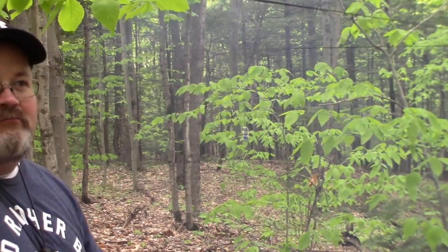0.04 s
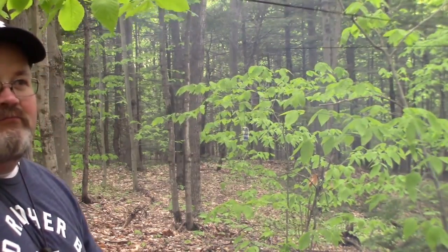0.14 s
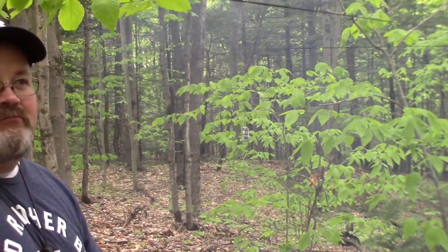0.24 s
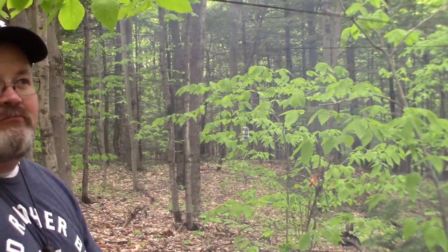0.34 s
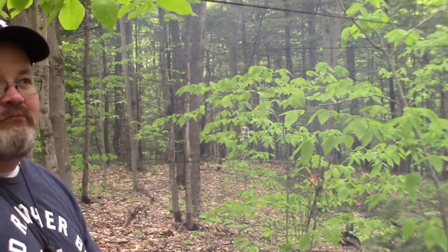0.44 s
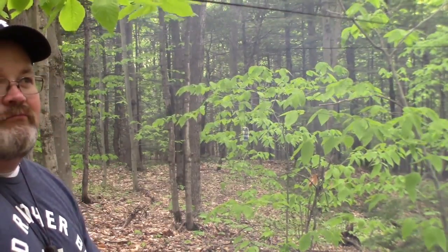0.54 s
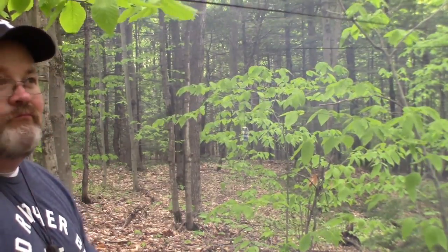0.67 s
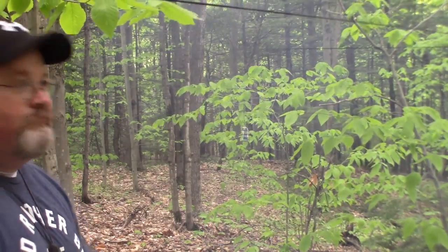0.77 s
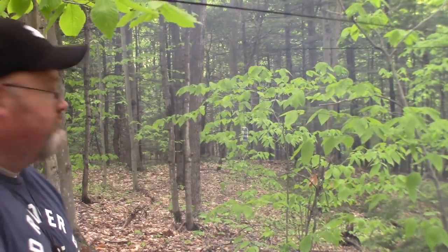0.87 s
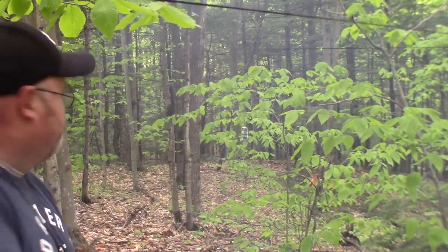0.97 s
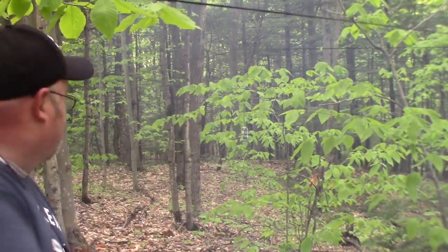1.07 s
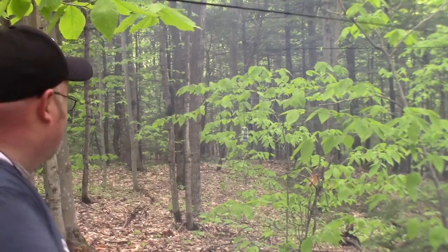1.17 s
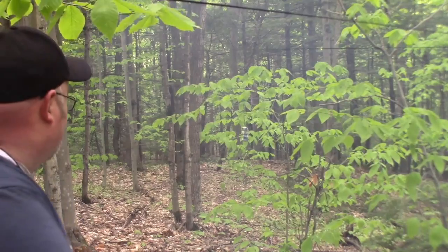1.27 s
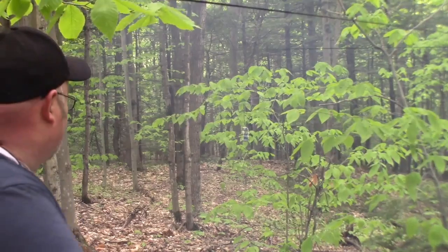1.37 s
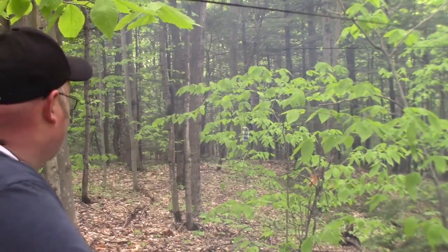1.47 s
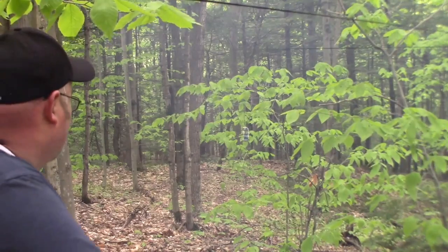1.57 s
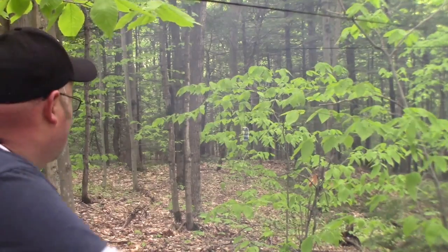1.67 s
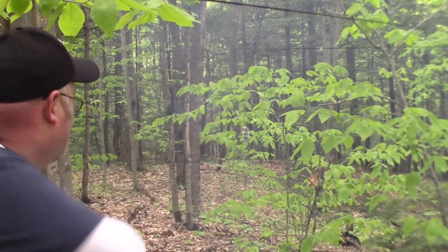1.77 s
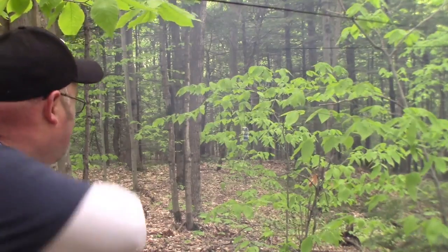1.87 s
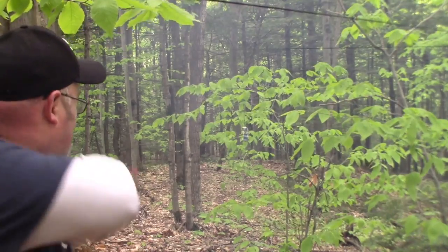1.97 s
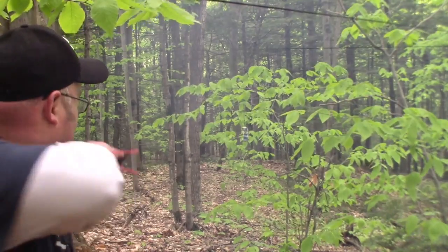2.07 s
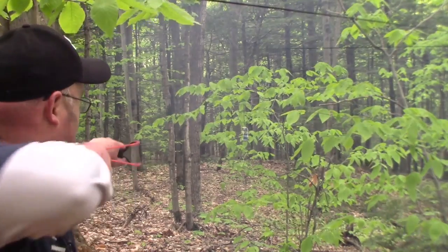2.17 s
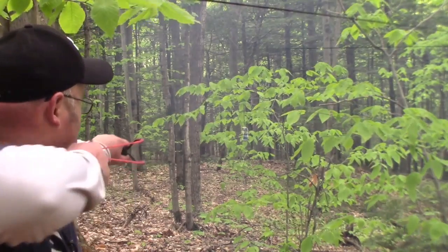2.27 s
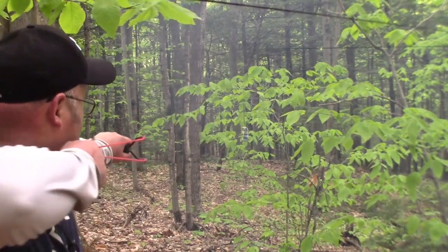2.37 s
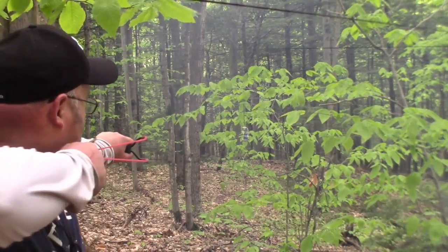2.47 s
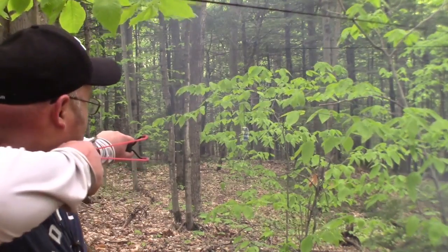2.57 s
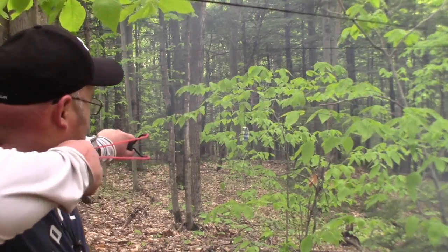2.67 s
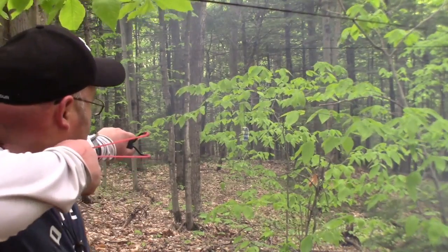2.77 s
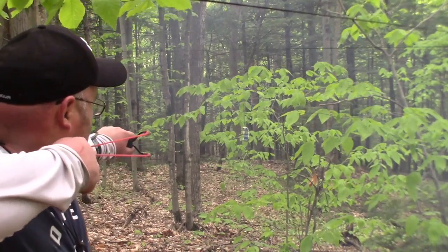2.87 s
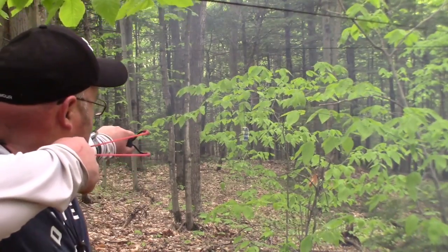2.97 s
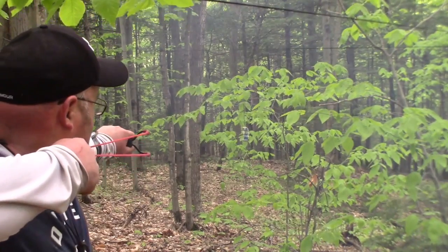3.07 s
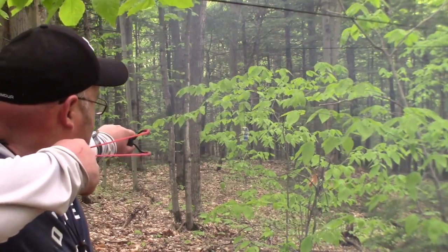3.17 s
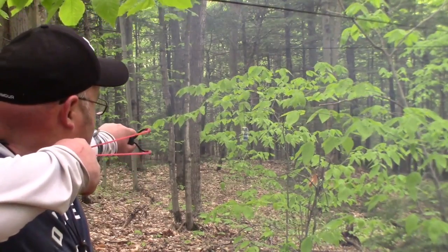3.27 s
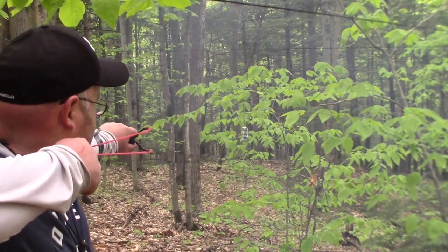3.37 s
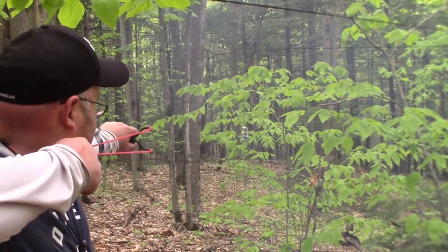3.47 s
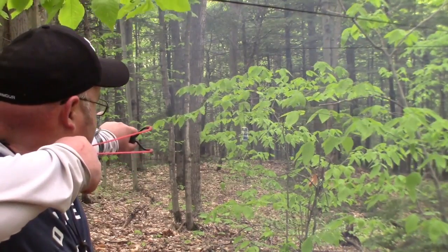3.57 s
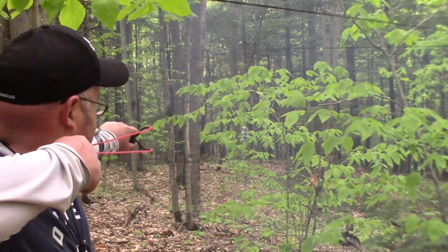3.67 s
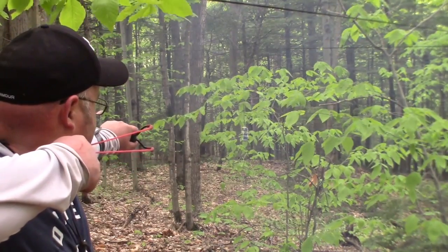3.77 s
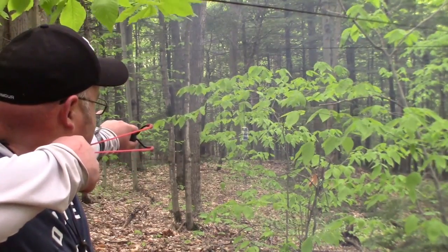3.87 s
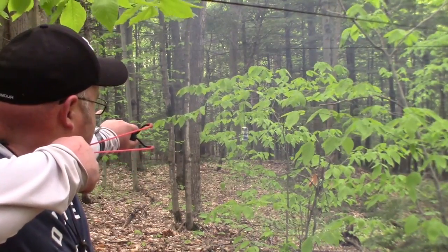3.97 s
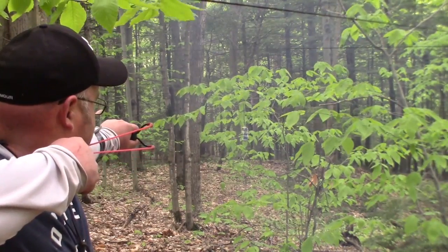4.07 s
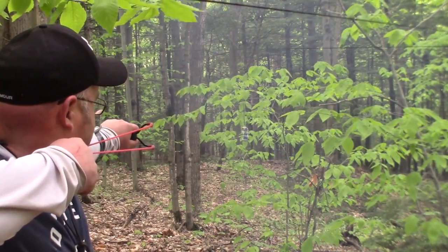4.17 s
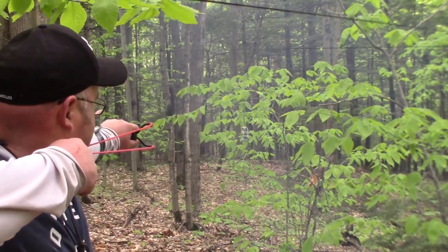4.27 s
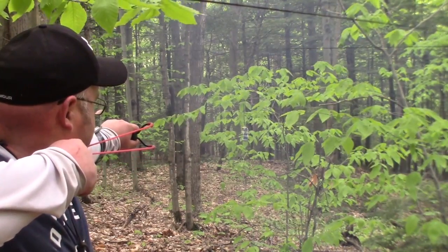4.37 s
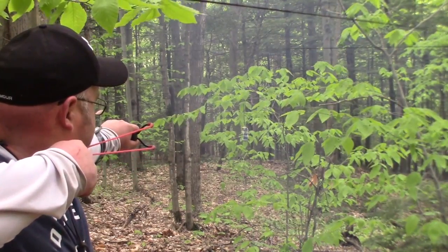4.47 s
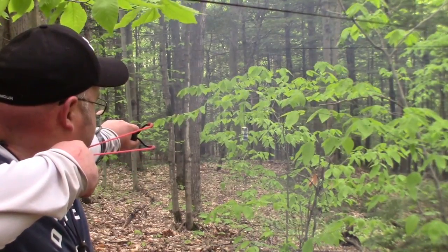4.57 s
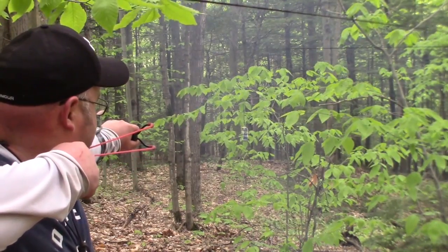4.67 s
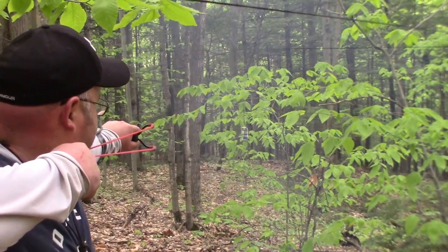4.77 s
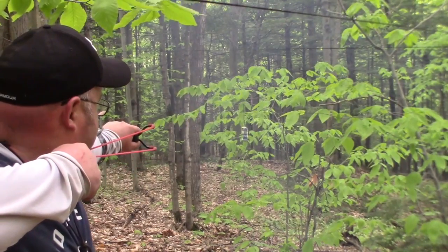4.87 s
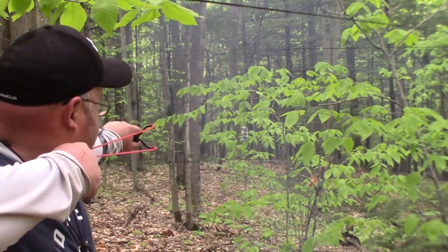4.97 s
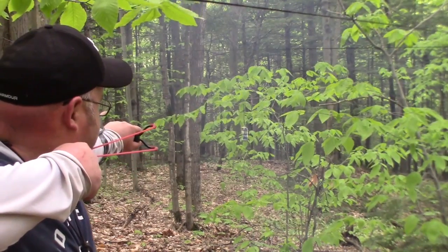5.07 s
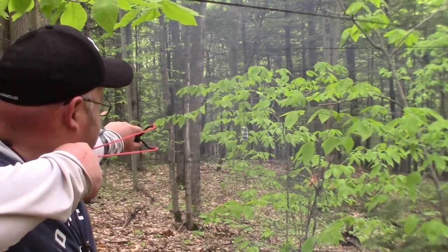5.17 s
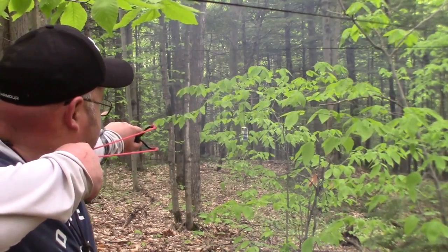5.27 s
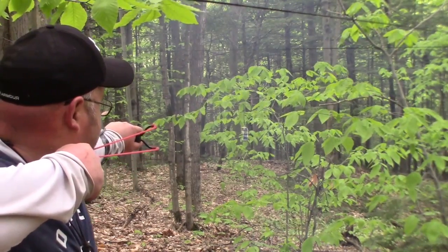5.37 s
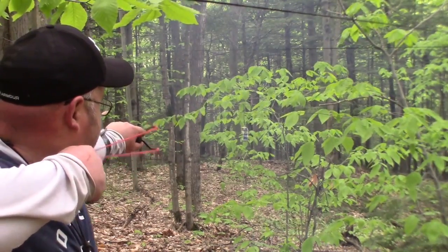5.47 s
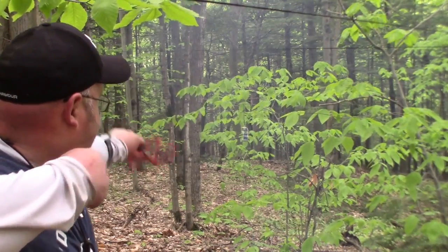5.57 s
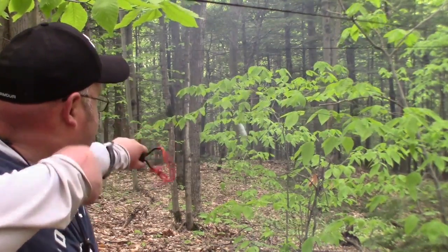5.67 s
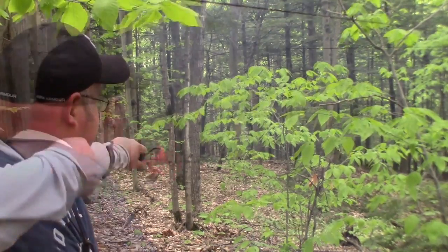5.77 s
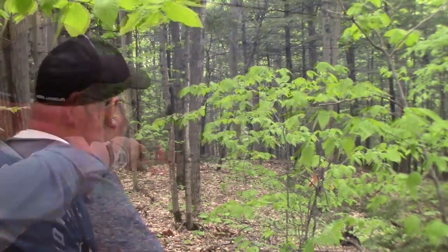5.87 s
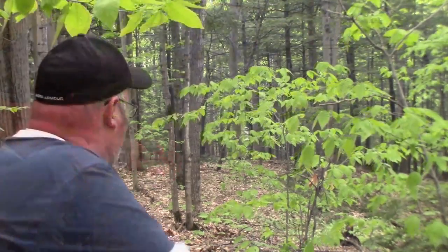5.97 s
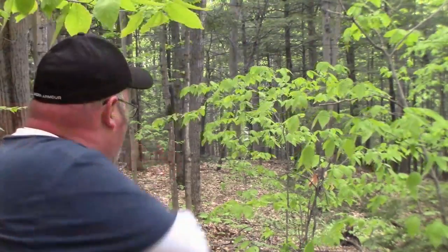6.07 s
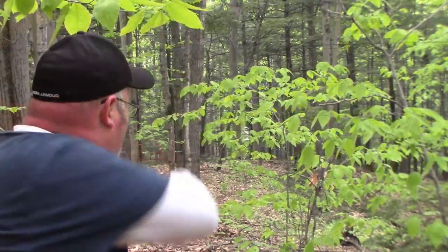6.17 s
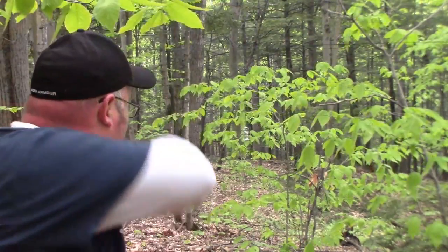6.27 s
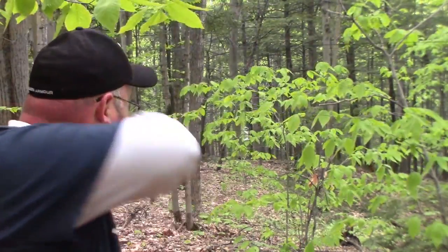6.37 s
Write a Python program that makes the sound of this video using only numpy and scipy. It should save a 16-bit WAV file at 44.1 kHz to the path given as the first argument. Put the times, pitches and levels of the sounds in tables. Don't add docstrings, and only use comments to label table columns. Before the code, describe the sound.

Outdoor woodland with faint distant traffic hum and small wind puffs on the microphone. Leaves and cloth rustle close by with dry twig ticks, while birds repeat burry phrases and one loud upward call. Rubber creaks softly as it is drawn. Near the end the slingshot snaps in a rapid cluster of slaps, a hard crack answers from a trunk and echoes, and cloth brushes by.

```python
import sys
import numpy as np
from scipy import signal
from scipy.fft import rfft, irfft, next_fast_len
from scipy.io import wavfile
from scipy.ndimage import uniform_filter1d

SR = 44100
rng = np.random.default_rng(int(sys.argv[2]) if len(sys.argv) > 2 else 0)


def level_to_linear(level):
    exponent = np.asarray(level, float) / 20
    return 10 ** exponent


def pcm_store(signal):
    levels = np.round(np.clip(np.atleast_2d(signal), -1, 1) * 32767)
    wavfile.write(sys.argv[1], SR, levels.astype(np.int16).T)


N = 283518


def unit(x):
    return x / np.sqrt(np.mean(x ** 2) + 1e-20)


def along(points, hz):
    f, v = np.transpose(points)
    return np.interp(np.log(hz + 1), np.log(f + 1), v)


def filtered(x, response):
    m = next_fast_len(x.shape[-1] + 8192)
    spectrum = rfft(x, m) * response(np.fft.rfftfreq(m, 1 / SR))
    return irfft(spectrum, m)[..., :x.shape[-1]]


def noise(spectrum, alike, patchy_db=1, size=N):
    z = signal.stft(rng.standard_normal((2, size + 512)), nperseg=256)[2]
    patches = uniform_filter1d(rng.standard_normal(z.shape[1:]), 4, 0)
    patches = unit(uniform_filter1d(patches, 8, 1))
    pair = signal.istft(z * level_to_linear(patchy_db * patches), nperseg=256)[1][:, :size]

    def mid_side_gain(hz):
        turn = np.arccos(np.clip(along(alike, hz), -1, 1)) / 2
        return level_to_linear(along(spectrum, hz)) * [np.cos(turn), np.sin(turn)]

    mid, side = filtered(pair, mid_side_gain)
    return unit(np.array([mid + side, mid - side]))


def pan(db):
    return level_to_linear([[db / 2], [-db / 2]])


def add(track, s, sound):
    part = track[..., round(s * SR):][..., :sound.shape[-1]]
    part += sound[..., :part.shape[-1]]


def swells(rows):
    t = np.arange(N) / SR
    levels = [db - 20 * np.maximum((s - t) / rise_s, (t - s) / fall_s) for s, db, rise_s, fall_s in rows]
    return level_to_linear(np.max(levels, axis=0))


def burst(hz, octaves, t60):
    t = np.arange(4096) / SR
    x = filtered(rng.standard_normal(4096), lambda f: np.exp(-.5 * (np.log2((f + 1) / hz) / octaves) ** 2))
    x = x * level_to_linear(-60 * t / t60) * (1 - np.exp(-t / 0.00014))
    return x / np.abs(x).max()


def whistle(notes, shift_s=0, gain_db=0, fade_s=0.0021):
    out = np.zeros(N)
    for note in notes:
        s, hz, db, burr_hz = np.transpose(note)
        t = np.arange(s[0], s[-1], 1 / SR)
        fade = np.minimum(1, np.minimum(t - s[0], s[-1] - t) / fade_s)
        shake = unit(uniform_filter1d(rng.standard_normal(2 * SR), 60))[:len(t)]
        pitch_hz = np.interp(t, s, hz) + shake * np.interp(t, s, burr_hz)
        tone = np.sqrt(2) * np.sin(2 * np.pi * np.cumsum(pitch_hz) / SR)
        add(out, max(0, s[0] + shift_s), fade * level_to_linear(np.interp(t, s, db) + gain_db) * tone)
    return out


def burred(note, burr_hz):
    return [(*row, burr_hz) for row in note]


def glides(rows, burr_hz, knee, done, onset_db, end_db):
    notes = []
    for s, length, hz, last_hz, db in rows:
        onset = (s, hz, db + onset_db)
        loudest = (s + knee * length, hz + done * (last_hz - hz), db)
        end = (s + length, last_hz, db + end_db)
        notes.append(burred([onset, loudest, end], burr_hz))
    return notes


def calls_up(rows, sag, fade_db):
    effort_db_per_octave, hold_s, climb_burr_hz, hold_burr_hz = 21, .18, 125, 95
    notes = []
    for s, climb, hz, top_hz, db in rows:
        start_db = db - effort_db_per_octave * np.log2(top_hz / hz)
        notes.append([(s, hz, start_db, climb_burr_hz),
                      (s + climb, top_hz, db, climb_burr_hz),
                      (s + climb + hold_s, sag * top_hz, db - fade_db, hold_burr_hz)])
    return notes


def among_trees(x, direct_db, t60, pan_db, alike):
    t = np.arange(SR) / SR
    a, b = rng.standard_normal((2, SR)) * level_to_linear(-60 * t / t60) * (1 - np.exp(-t / 0.0033))
    tail = np.array([a + alike * b, a - alike * b]) / np.linalg.norm(a)
    scattered = signal.fftconvolve(x[None], tail, axes=1)[:, :N]
    return pan(pan_db) * (level_to_linear(direct_db) * x + scattered)


def background():
    # [f/Hz, level/dB per Hz]
    air = [(12, -37), (20, -3.5), (98, -0.5), (185, -4), (266, -0.5), (352, -3), (534, -4), (649, -7),
           (833, -7.5), (1130, -13.5), (1920, -21), (5230, -25.5), (14200, -32), (15500, -31.5)]
    # [f/Hz, likeness 0..1]
    likeness = [(60, 0.9), (240, 0.93), (950, 0.84), (3770, 0.26), (15000, 0.26)]
    return level_to_linear(-49) * noise(air, likeness, patchy_db=0.75)


def buffet():
    # [t/s, peak level/dB, fall by 20 dB/s]
    puffs = [(0, -46, .25), (.27, -52, .5), (.84, -49, .25), (1.98, -60, .8), (2.57, -56, .3),
             (2.78, -44, 0.15), (3.35, -58, .3), (3.6, -54, .4), (4.0, -62, 2), (4.54, -56, .3),
             (4.93, -54, .15), (5.08, -56, .4), (5.64, -51, .12), (6.03, -50, .12), (6.13, -39, .35),
             (6.24, -41, .3), (6.35, -41, 0.5)]
    rumble = [(15, -4.5), (30, -0.5), (60, -9.0), (110, -24.0), (200, -59)]  # (f/Hz, level/dB per Hz)
    stir = noise(rumble, [(30, 0.97)], patchy_db=0.5)
    rise_share = .45
    return swells([(s, db, rise_share * fall_s, fall_s) for s, db, fall_s in puffs]) * stir


def rustle():
    # [t/s, peak level/dB, rise by 20 dB/s, fall by 20 dB/s]
    moves = [
        (0, -60.5, .01, 0.2),
        (.178, -51, .008, .2),
        (.335, -55.5, .015, 0.08),
        (.42, -59, .05, 0.2),
        (.755, -59.5, 0.33, .3),
        (1.01, -62, .5, 0.6),
        (1.35, -60, 0.3, .15),
        (2.05, -66.5, 6.0, 2.5),
    ]
    # [f/Hz, level/dB per Hz]
    cloth = [(880, -46), (1500, -10), (1950, -6), (2620, -14), (3870, -3), (6010, -3.5), (6820, -10.5),
             (10500, -10), (15500, -21.5)]
    # [t/s, peak level/dB, centre f/Hz]
    ticks = [(0.185, -35, 8420), (0.197, -28, 6900), (0.334, -41.5, 7940), (0.393, -55, 8090),
             (0.405, -40, 7420), (0.4707, -40, 10300), (0.4977, -41, 10600), (0.585, -53, 7460),
             (0.6217, -41, 9810), (0.9, -41, 7970), (1.06, -23.5, 7100), (1.3384, -27, 6650),
             (1.6055, -37, 9010), (1.8022, -41, 9100), (1.9603, -47, 11700), (2.152, -41, 8200),
             (2.3375, -48, 8340), (3.553, -41.5, 10200), (3.7244, -39.5, 9730), (4.0022, -54, 9610),
             (4.4198, -50, 8860), (5.0294, -52, 8560)]
    # [t/s, peak level/dB, rise by 20 dB/s, fall by 20 dB/s]
    arm = [(6.25, -53.5, .22, 5)]
    # [f/Hz, level/dB per Hz]
    sleeve = [(410, -33), (700, -17), (895, -2), (1010, -5), (1100, -6), (1240, -8), (5020, -14),
              (15500, -34.5)]
    out = level_to_linear(5) * swells(moves) * noise(cloth, [(5000, 1.0)], patchy_db=2.5)
    out = out + swells(arm) * noise(sleeve, [(3000, .9)], patchy_db=0.0)
    for s, db, hz in ticks:
        snap = level_to_linear(db) * burst(hz, octaves=0.46, t60=0.0019)
        crackle = level_to_linear(db - 15.5) * burst(hz, octaves=.8, t60=0.1)
        add(out, s, snap + crackle)
    return out * pan(-1.3)


def whistler():
    # [t/s, f/Hz, level/dB]
    slur = [
        (3.6, 3600, -67),
        (3.625, 4180, -62),
        (3.66, 4430, -55.5),
        (3.74, 4390, -69.5),
        (3.9, 4370, -77),
        (3.975, 3480, -66),
        (4.12, 3380, -70),
        (4.45, 3800, -64.5),
        (4.7, 4060, -66.5),
    ]
    # [t/s, length/s, first f/Hz, last f/Hz, level/dB]
    clear = [
        (4.93, .11, 4280, 4920, -59.5),
        (5.23, .15, 4120, 3780, -66.5),
        (.17, .23, 3850, 3400, -68),
        (4.7, .14, 4050, 3980, -73),
    ]
    # [t/s, length/s, first f/Hz, last f/Hz, level/dB]
    hoarse = [
        (5.05, 0.17, 4950, 5750, -65),
        (3.63, .22, 3920, 4020, -65.5),
        (3.9, .09, 4200, 3500, -67),
        (2.46, .3, 2650, 2750, -67),
        (0, .14, 3000, 2900, -57),
    ]
    notes = [burred(slur, burr_hz=42)]
    notes += glides(clear, burr_hz=35, knee=.6, done=.62, onset_db=-3.5, end_db=-1.0)
    notes += glides(hoarse, burr_hz=280, knee=.35, done=.45, onset_db=-5, end_db=-8)
    return among_trees(whistle(notes, gain_db=1.0), direct_db=-1.0, t60=1.0, pan_db=0.5, alike=0.19)


def singer():
    # [t/s, level/dB]
    repeats = [(0.431, -61.5), (.7, -60), (0.959, -57.5), (1.225, -55.5), (1.501, -56), (1.775, -54),
               (2.045, -55)]
    # [t after its start/s, length/s, first f/Hz, last f/Hz, level/dB]
    motif = [
        (-.09, .09, 5140, 5350, -10),
        (0, .05, 4573, 3180, 0),
        (.062, .03, 4400, 3900, -4),
    ]
    # [t after phrase start/s, length/s, first f/Hz, last f/Hz, level/dB]
    ending = [(.092, .035, 3880, 3850, -6)]
    phrase = glides(motif, burr_hz=140, knee=.65, done=.9, onset_db=-1.5, end_db=-2.5)
    phrase += glides(ending, burr_hz=50, knee=.3, done=.4, onset_db=-1.5, end_db=-4)
    song = sum(whistle(phrase, s, db) for s, db in repeats)
    return among_trees(song, direct_db=-1.0, t60=0.98, pan_db=-1.0, alike=0.15)


def caller():
    # [t/s, climb/s, first f/Hz, top f/Hz, top level/dB]
    main_voice = [
        (.845, .11, 2177, 2860, -43),
        (5.035, .1, 2383, 2910, -47.5),
    ]
    # [t/s, climb/s, first f/Hz, top f/Hz, top level/dB]
    side_voice = [
        (.86, .12, 2750, 3380, -54),
        (.95, .07, 2400, 2410, -54),
        (4.84, .19, 1745, 2380, -54),
        (5.11, 0.052, 2960, 3200, -49),
        (.66, 0.033, 2950, 2950, -66),
        (5.035, .025, 3340, 3710, -65),
    ]
    notes = calls_up(main_voice, sag=.96, fade_db=6.5) + calls_up(side_voice, sag=0.98, fade_db=21)
    return among_trees(whistle(notes, fade_s=.008), direct_db=-3, t60=1.1, pan_db=-0.8, alike=0.34)


def creaks():
    # [t/s, peak level/dB, top mode relative level/dB]
    slips = [(2.2394, -49, -10), (2.4387, -48, -1), (2.4514, -53, -16), (2.6079, -44.5, -2.5),
             (2.6383, -58, -9), (2.8698, -45, -4), (2.9916, -45, 0), (3.237, -46, -3), (3.3, -47.5, 1),
             (3.331, -51, -19), (3.442, -53, -15), (4.608, -52, -2), (4.681, -47, -22)]
    out = np.zeros(N)
    for s, db, top_db in slips:
        add(out, s, level_to_linear(db - 10.5) * burst(3160, octaves=0.084, t60=0.034))
        add(out, s, level_to_linear(db + 3.5) * burst(4900, octaves=0.18, t60=0.0091))
        add(out, s, level_to_linear(db + top_db) * burst(7970, octaves=0.089, t60=0.0083))
    return out * pan(-.6)


def release():
    # [t/s, peak level/dB, centre f/Hz, t60/s, low thump level/dB]
    slap_rows = [(5.6269, -7.5, 3000, 0.0043, -20), (5.633, -26, 4000, .01, -28),
                 (5.6436, -12, 4000, 0.0074, -15.5), (5.6468, -8, 7000, 0.012, -17.5),
                 (5.649, -10, 9500, .007, -14), (5.657, -11, 4840, .014, -24),
                 (5.6638, -17, 4470, .02, -29), (5.6792, -7, 9000, .005, -21),
                 (5.685, -23.5, 6000, .015, -22), (5.6964, -5, 4800, .007, -12),
                 (5.706, -25, 5000, .006, -29)]
    # [f/Hz, width/Hz, level/dB]
    modes = [(130, 110, -2.5), (434, 74, -4.5), (1130, 570, -2)]
    # [f/Hz, level/dB per Hz]
    rubber = [(35, -37), (60, -8), (285, -5.5), (546, -7), (791, -4.5), (1550, -5), (2910, -6.5),
              (5840, -2.5), (10200, -15), (15500, -21)]
    # [t/s, peak level/dB, rise by 20 dB/s, fall by 20 dB/s]
    flaps = [
        (5.626, -29, .01, .1),
        (5.636, -29, .02, .1),
        (5.652, -23, .02, .09),
        (5.705, -31.5, .3, .06),
        (5.745, -46, .1, .12),
    ]
    # [t/s, f/Hz, level/dB]
    squeal = [
        (5.6458, 3180, -20),
        (5.6469, 3800, -3.5),
        (5.6478, 5170, -11.5),
        (5.65, 5200, -15),
        (5.6518, 5000, -23),
    ]
    slip_s = 5.6205
    slap_spread_hz = 20.3
    slaps, pushes = np.zeros(N), np.zeros(N)
    for s, db, hz, t60, thump_db in slap_rows:
        add(slaps, s, level_to_linear(db) * burst(hz, slap_spread_hz / (t60 * hz), t60))
        add(pushes, s, level_to_linear(thump_db + 20.5) * burst(1050, 3.7, 0.0042))

    def fork(f):
        return sum((-1) ** k * level_to_linear(db) * 1j * f * width / (centre * centre - f * f + 1j * f * width)
                   for k, (centre, width, db) in enumerate(modes))

    thumps = filtered(pushes, fork)
    chirp = whistle([burred(squeal, burr_hz=150)], fade_s=0.00021)
    loosened = np.clip((np.arange(N) / SR - slip_s) / .007, 0, 1) ** 2
    flapping = swells(flaps) * loosened * noise(rubber, [(3000, 0.93)], patchy_db=2.1)
    return (slaps + chirp + thumps + flapping) * pan(-.3)


def strike():
    # [f/Hz, level/dB per Hz]
    impact = [(88, -46), (150, -3.5), (1060, -2), (1830, -8), (2230, 2), (2500, -9.5), (3340, -2.5),
              (5330, 1.5), (12800, -8.5), (15500, -21)]
    # [f/Hz, level/dB, t60/s]
    wood = [(350, -31, 0.031), (876, -25.5, 0.21), (1440, -20.5, .05)]
    # [f/Hz, level/dB per Hz]
    answer = [(88, -60), (150, -28), (420, -3), (1000, -3.5), (1110, -8.5), (1420, -2.5), (2920, -7.5),
              (5030, -1.5), (10100, -9), (15500, -21.5)]
    # [f/Hz, t60/s]
    answer_t60 = [(250, 0.58), (1000, 0.56), (3000, 0.53), (5000, 0.47), (8000, 0.33), (12000, 0.25)]
    t = np.arange(SR) / SR
    crack = noise(impact, [(3000, 1.0)], size=SR) * (level_to_linear(-9 - 60 * t / 0.0092) + level_to_linear(-12.5 - 60 * t / 0.079))
    ring = sum(level_to_linear(db - 60 * t / t60) * np.sin(2 * np.pi * hz * t) for hz, db, t60 in wood)
    scatter = noise(answer, [(3000, 0.96)], patchy_db=1.0, size=SR)
    hz, frames, z = signal.stft(scatter, SR, nperseg=256)
    decay = level_to_linear(-60 * np.maximum(frames - .05, 0) / along(answer_t60, hz)[:, None])
    echo = signal.istft(z * decay, SR, nperseg=256)[1][:, :SR]
    swell = (1 - np.exp(-t / 0.0041)) * (1 + 0.65 * np.exp(-((t - .04) / 0.018) ** 2))
    echo = level_to_linear(-25) * echo * swell
    thin = signal.butter(6, 300, "high", fs=SR, output="sos")
    out = np.zeros((2, N))
    add(out, 5.7765, signal.sosfilt(thin, crack + ring + echo))
    return out * pan(-.1)


def scene():
    surroundings = background() + whistler() + singer() + caller()
    near = buffet() + rustle() + creaks()
    shot = release() + strike()
    t = np.arange(N) / SR
    duck = level_to_linear(-7.5 * (t > 5.65) * np.exp(-np.maximum(t - 6.17, 0) / 0.045))
    return duck * surroundings + near + shot


def top_cut(x):
    return signal.sosfilt(signal.butter(12, 15640, fs=SR, output="sos"), x)


def record(dry):
    # [f/Hz, left minus right level/dB]
    lean = [(60, 1), (180, 2.5), (550, -2), (1650, -2.0), (4970, -2.5), (10000, -3), (15000, -0.6)]
    # [f/Hz, level/dB]
    capsule = [(12000, 0), (14500, -1), (15600, -5.5)]
    top_hz = 15650
    ports = filtered(dry, lambda hz: level_to_linear(along(lean, hz) * np.array([[.5], [-.5]])))
    held = ports / (1 + np.abs(ports / 1.05) ** 8) ** (1 / 8)
    mix = filtered(held, lambda hz: level_to_linear(along(capsule, hz)) * (hz < top_hz))
    return top_cut(mix)


dry = scene()
out = record(dry)
pcm_store(out)
```